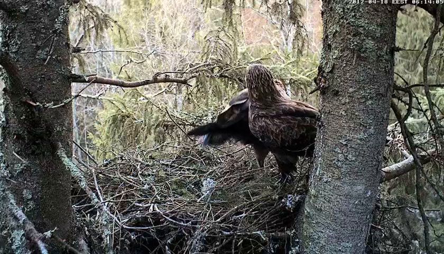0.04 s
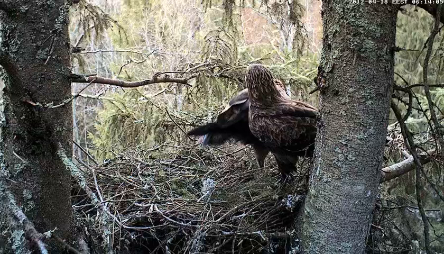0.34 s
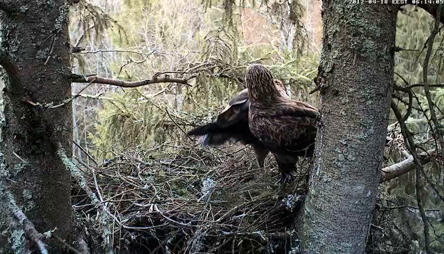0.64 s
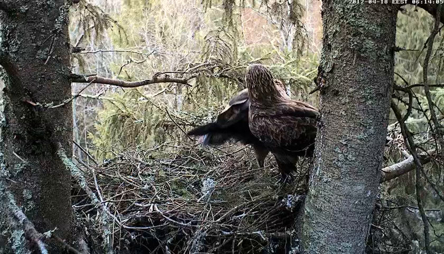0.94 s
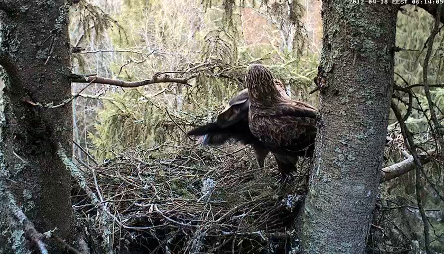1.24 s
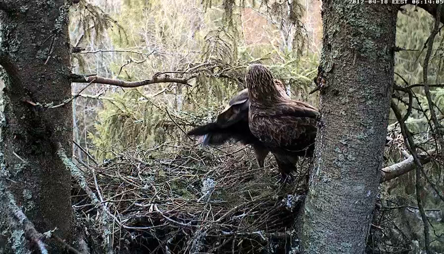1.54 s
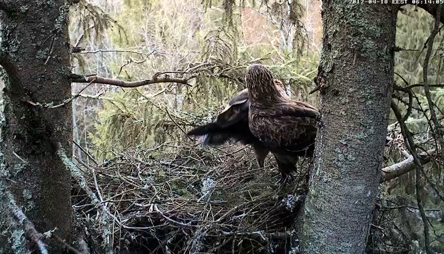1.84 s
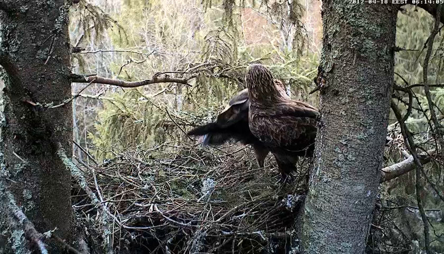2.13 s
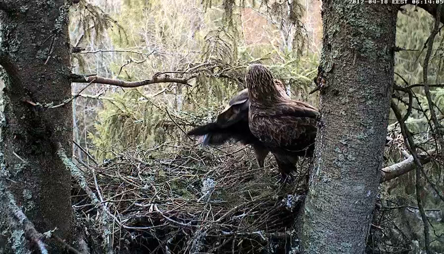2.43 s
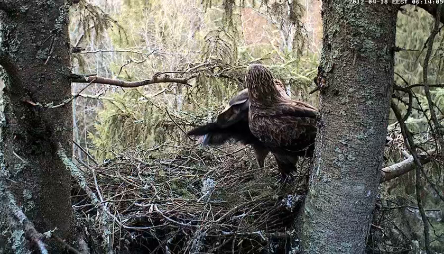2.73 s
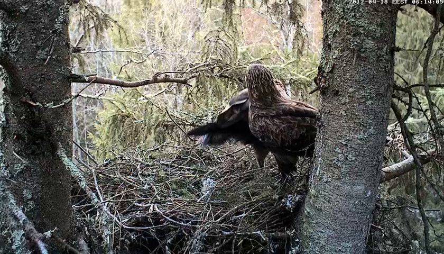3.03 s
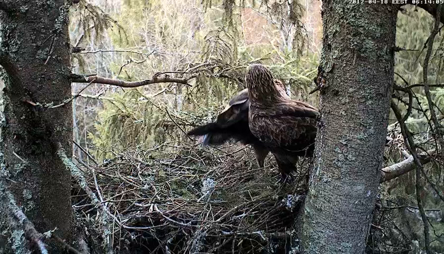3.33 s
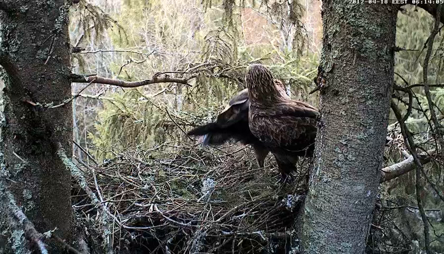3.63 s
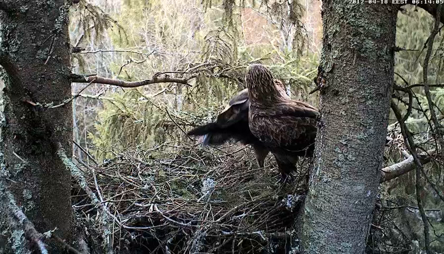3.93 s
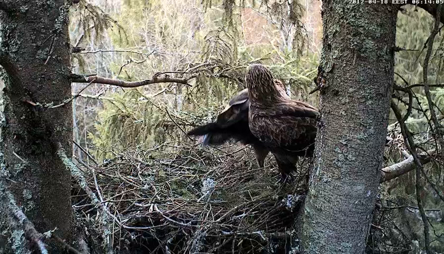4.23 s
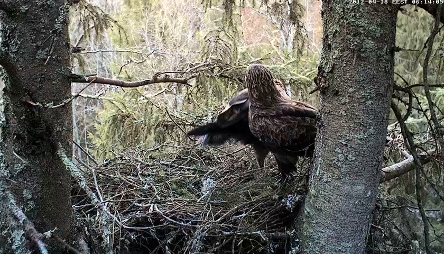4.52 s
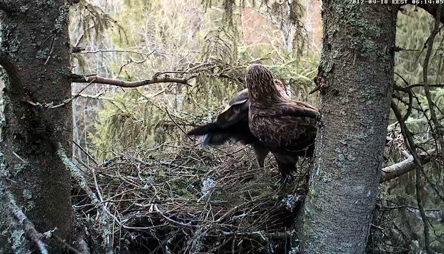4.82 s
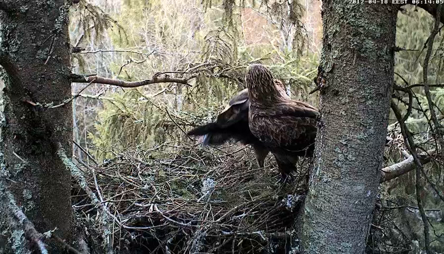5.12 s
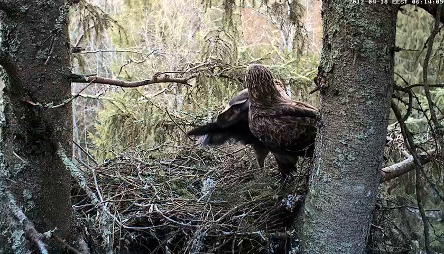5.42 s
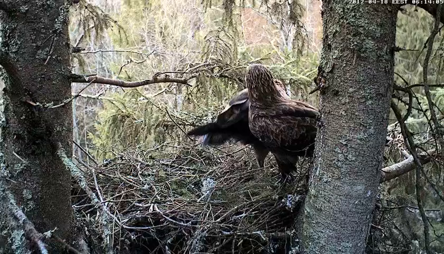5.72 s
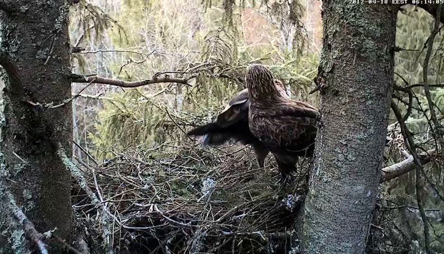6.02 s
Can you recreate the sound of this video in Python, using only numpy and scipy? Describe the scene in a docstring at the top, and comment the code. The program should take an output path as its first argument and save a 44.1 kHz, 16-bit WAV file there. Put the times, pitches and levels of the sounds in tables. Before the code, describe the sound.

An eagle calls three times close by in a forest, each short, hoarse squeal rising and then breaking into a clear falling whistle. The first two come near each other, the second loudest and slightly distorted; the third, raspier, follows a pause. The woods ring briefly after each. Small birds chirp faintly farther off over a soft hiss of trees. The sound is narrow, like a telephone.

```python
"""An eagle gives three loud, squealing calls close by: each rises hoarsely as the syrinx shakes, then
breaks into a clear falling whistle. The tail of another call dies away at the opening.
The forest rings after each call, small birds chirp in gliding tones farther off, the trees hiss softly.
It all passes through a telephone-rate converter that overloads on the loudest notes."""
import sys
import numpy as np
from scipy import signal
from scipy.fft import rfft, irfft, next_fast_len
from scipy.io import wavfile
from scipy.ndimage import uniform_filter1d

SR = 44100
rng = np.random.default_rng(int(sys.argv[2]) if len(sys.argv) > 2 else 0)


def master_out(mix):
    """Clip the mix to full scale and print it as 16-bit PCM to the path in sys.argv[1]."""
    frames = np.transpose(np.atleast_2d(mix))
    ceiling = np.clip(frames, -1, 1)
    pcm = np.round(ceiling * 32767).astype(np.int16)
    wavfile.write(sys.argv[1], SR, pcm)


N = 276507
T = np.arange(N) / SR

# The eagle's hoarse squeals, leading up to each whistle:
# t/s, length/s, start f/Hz, end f/Hz, end level/dB, swell/dB, hoarseness/0-1, treble strain/dB
SQUEALS = [ (.627, 0.038, 1290, 1623, -26.5, 13.5, 0.26, 2), (0.667, 0.025, 1891, 2020, -36.5, 1, 0.5, -9),
           (.696, 0.11, 1850, 1900, -42, 0.5, .9, -3.5), (.814, 0.031, 1900, 2048, -29.5, 5.5, 0.64, 1.5),
           (0.843, .011, 2100, 1696, -2.5, 31, .14, -5.5), (2.079, .09, 1292, 1948, -14, 31, .37, 0),
           (2.172, 0.14, 2320, 2258, -14.5, 10.5, 0.3, 3), (5.414, .135, 1588, 2090, -21, 22, .48, 3)]
# Its clear whistles, held and let go: t/s, hold/s, release/s, start f/Hz, held f/Hz, end f/Hz,
# start level/dB, held level/dB, fade/dB, extra hoarseness at the attack/0-1, treble strain/dB
WHISTLES = [ (0, 0.011, .07, 1717, 1725, 1687, 3, -10, 44, 0.07, -7.5),
            (0.854, .062, .087, 1620, 1588, 1319, -8.5, -9, 16.5, 0.05, -9.5),
            (2.303, .062, .12, 1923, 1864, 1333, -5, 1, 33, .14, -2),
            (5.55, .128, .072, 2114, 1943, 1530, -19, -11, 26.5, .38, 9)]
# Tremolo on the long notes: t/s, length/s, rate/Hz, depth/dB
THROBS = [(0.909, .094, 32, 2), (2.195, .28, 21.5, 0.5), (5.433, 0.37, 22.5, 3)]
# Second and third harmonic, ahead of the beak EQ: level/dB
OVERTONES_DB = [-25, -37.5]
# The open beak, ringing near 3.5 kHz: f/Hz, level/dB
BEAK_EQ = [(2700, 4), (3150, 4), (3400, 10), (3600, 1), (4000, -4), (4400, -10)]
# The throat's colour on the rasp: f/Hz, level/dB
THROAT_EQ = [(300, -28), (800, -12.5), (1200, -15.5), (1600, -1), (2000, 1.5), (2400, -5), (2850, -12.5),
             (3180, -11), (3450, -10.5), (4200, -44.5)]
# The band that strain lifts or dips: f/Hz, level/dB
STRAIN_EQ = [(2000, -61.5), (2500, -17.5), (3100, 1.5)]
# Envelope of the syrinx's other side, joining the last call on a lower note: t/s, level/dB
SECOND_VOICE_ENVELOPE = [(5.4, -59.5), (5.45, -37), (5.53, -47.5), (5.6, -37.5), (5.67, -58.5),
                         (5.735, -43.5), (5.775, -59)]
# What the trees send back of the eagle: f/Hz, level/dB
ECHO_EQ = [(500, -12), (1350, -2.5), (1620, -4), (1800, -9), (1930, -3.5), (2040, 10), (2150, -2.5),
           (2300, 0.5), (3100, 2.5), (3450, 4)]
# A small bird's dive-and-curl chirps: t/s, length/s, start f/Hz, level/dB, direct gain/dB
SWOOPS = [ (0.235, .11, 3000, -45.5, 1.5), (0.364, 0.098, 2400, -53, 6), (.55, 0.042, 3400, -38, -1.5),
          (1.157, 0.099, 3150, -36.5, -6.5), (1.283, 0.092, 3480, -44.5, 1),
          (1.485, 0.083, 3380, -40.5, 1.5)]
# Other small birds' straight glides: t/s, length/s, start f/Hz, end f/Hz, level/dB
SLIDES = [ (0.612, 0.079, 2507, 2870, -42), (1.24, .05, 2254, 2740, -47.5), (1.556, 0.084, 2440, 2796, -43),
          (1.95, .1, 2037, 2480, -46), (2.902, 0.098, 2198, 2657, -39.5), (3.103, 0.08, 2608, 2130, -39),
          (3.206, 0.051, 2366, 2606, -45.5), (3.503, 0.04, 3724, 3090, -53.5),
          (3.728, 0.055, 3260, 3040, -61.5), (3.746, .26, 2473, 2093, -53),
          (4.008, 0.052, 2800, 2333, -40.5), (4.009, 0.14, 3400, 3716, -49.5),
          (4.171, 0.086, 2518, 2160, -43), (4.289, .091, 2470, 2120, -43), (4.493, .07, 3350, 3740, -61),
          (4.755, 0.078, 3370, 3767, -47), (4.824, 0.011, 3520, 3970, -44.5),
          (4.85, 0.012, 3850, 3390, -49.5), (4.979, 0.019, 2585, 3150, -40),
          (4.994, 0.038, 3112, 2400, -43.5)]
# Spectrum of the hiss in the trees: f/Hz, level/dB
TREE_HISS_EQ = [(15, -45.5), (25, -15), (101, -19), (130, -12.5), (192, -5), (270, -5.5), (406, -4.5),
                (514, -4), (917, -8), (1470, -13.5), (2210, -1.5), (2570, -5), (2790, -11.5), (3110, -6),
                (4200, -10), (5460, -61.5), (9240, -120)]
# Colour of the overload's fizz: f/Hz, level/dB
FIZZ_EQ = [(5000, 0), (6200, 3.5), (8500, 2), (10000, -2), (15000, -4)]


def eagle_calls(pitch, strength, hoarse, strain_db, jitter=.024, shake=.82, shake_hz=230, rasp_hz=650):
    """A whistling syrinx; when hoarse, its pitch and strength shake and rasp spreads round the tone."""
    phase = sweep_phase(pitch * (1 + jitter * hoarse * flutter(shake_hz)))
    tone = np.sin(phase) * (1 + shake * hoarse * flutter(shake_hz))
    # overtones come and go; in the hoarse parts they smear and sink into the rasp
    smear = (0.18 + 1.5 * hoarse) * flutter(140)
    overtones = sum(from_db(db) * np.sin(k * phase + smear) for k, db in enumerate(OVERTONES_DB, 2))
    flicker = 1 + 0.6 * np.tanh(flutter(52))
    tone += coloured(overtones, BEAK_EQ) * flicker * (1 - hoarse) ** 2
    # chaotic vibration makes wide sidebands, which the throat colours
    sidebands = flutter(rasp_hz, order=1) * np.sin(phase) + flutter(rasp_hz, order=1) * np.cos(phase)
    rasp = rms_one(coloured(sidebands, THROAT_EQ))
    voice = np.sqrt(2 * (1 - hoarse ** 2)) * tone + from_db(-4) * hoarse * rasp
    treble = coloured(voice, STRAIN_EQ)
    return strength * (voice + (from_db(strain_db) - 1) * treble)


def syrinx(glide_s=.0082, slew_s=.008, breath_db=1.38, breath_hz=33, wander=.03, wander_hz=39.9):
    """Play the notes legato as one voice: curves of pitch, strength, hoarseness and strain."""
    notes = [(s, strain_db, *squeal(*row)) for s, *row, strain_db in SQUEALS]
    notes += [(s, strain_db, *whistle(*row)) for s, *row, strain_db in WHISTLES]
    pitch, strength, hoarse, strain = np.zeros((4, N))
    for s, strain_db, hz, db, hoarseness in sorted(notes, key=lambda note: note[0]):
        start = int(s * SR)
        span = slice(start, start + len(hz))
        pitch[start:], hoarse[start:], strain[start:] = hz[-1], hoarseness[-1], strain_db
        pitch[span], strength[span], hoarse[span] = hz, from_db(db), hoarseness
    swing, throb_db = throbbing()
    hoarse *= 1 - 0.22 * swing   # crests clear the voice, troughs roughen it
    unsteady_breath = from_db(breath_db * flutter(breath_hz))
    strength = slewed(strength * from_db(throb_db), slew_s) * unsteady_breath
    pitch = slewed(pitch, glide_s) * (1 + wander * hoarse * flutter(wander_hz))
    return pitch, strength, np.clip(slewed(hoarse, slew_s), 0, 1), slewed(strain, slew_s)


def squeal(length, start_hz, end_hz, end_db, swell_db, hoarse, swell_s=.023, ease=1.3):
    """Pitch, level and hoarseness of a note that swells fast while its glide flattens out."""
    t = np.arange(int(length * SR)) / SR
    pitch = end_hz + (start_hz - end_hz) * (1 - t / length) ** ease
    still_to_swell = np.exp(-t / swell_s) - np.exp(-length / swell_s)
    return pitch, end_db - swell_db * still_to_swell, np.full(len(t), hoarse)


def whistle(hold, release, start_hz, held_hz, end_hz, start_db, held_db, fade_db, hoarse):
    """The held note clears to a trace of hoarseness; on release, pitch and level fall together."""
    t = np.arange(int((hold + release) * SR)) / SR
    held, let_go = np.minimum(t / hold, 1), np.maximum(t - hold, 0) / release
    pitch = start_hz + (held_hz - start_hz) * held + (end_hz - held_hz) * let_go
    level_db = start_db + (held_db - start_db) * held - fade_db * let_go ** 0.93
    return pitch, level_db, 0.036 + hoarse * (1 - held)


def throbbing():
    """The voice's tremolo: its swing (-1 in a trough, 1 on a crest) and its gain in dB."""
    swing, gain_db = np.zeros((2, N))
    for s, length, rate_hz, depth_db in THROBS:
        wave = -np.cos(2 * np.pi * rate_hz * (T - s)) * ((T >= s) & (T < s + length))
        swing += wave
        gain_db += depth_db * wave
    return swing, gain_db


def second_voice(pitch, low_hz=976, at_main_hz=1666, tracking=.35, jitter=.0392, shake=.73, sum_db=5):
    """The syrinx's low note couples with the last call, so the sum of their pitches sounds too."""
    s, level_db = np.transpose(SECOND_VOICE_ENVELOPE)
    low_pitch = (low_hz + tracking * (pitch - at_main_hz)) * (1 + jitter * flutter(211))
    tones = np.sin(sweep_phase(low_pitch)) + from_db(sum_db) * np.sin(sweep_phase(low_pitch + pitch))
    envelope = from_db(np.interp(T, s, level_db)) * ((T >= s[0]) & (T <= s[-1]))
    return np.sqrt(2) * envelope * (1 + shake * flutter(230)) * tones


def forest_reverb(x, near_t60=1.0, far_t60=2.4, far_db=-12, build_s=0.0085):
    """Countless faint echoes: near trunks answer fast and die soon, the deep wood rings on."""
    t = T[:2 * SR]
    decay = from_db(-60 * t / near_t60) + from_db(far_db - 60 * t / far_t60)
    echoes = rng.standard_normal(len(t)) * decay * (1 - np.exp(-t / build_s))
    return signal.fftconvolve(x, echoes / np.linalg.norm(echoes))[:N]


def swoops(dive_s=.043, low_hz=2100, curl_hz_per_s=6500):
    """A small bird's notes, each diving to the same low pitch and curling up again."""
    for s, length, start_hz, db, direct_db in SWOOPS:
        t = np.arange(int(length * SR)) / SR
        dive = np.cos(np.pi / 2 * np.minimum(t / dive_s, 1)) ** 2
        curl = curl_hz_per_s * np.maximum(t - dive_s, 0)
        yield s, low_hz + (start_hz - low_hz) * dive + curl, db, direct_db


def slides(unity_hz=2880, db_per_octave=17.5):
    """Plain gliding notes; the higher singers sit nearer, so they come through drier."""
    for s, length, start_hz, end_hz, db in SLIDES:
        pitch = np.linspace(start_hz, end_hz, int(length * SR))
        yield s, pitch, db, db_per_octave * np.log2(pitch.mean() / unity_hz)


def small_birds(fade_db=-4, ramp_share=0.12, waver=.022):
    """Swoops and slides as wavering sines; returns the reverb send and the direct sound."""
    send, direct = np.zeros((2, N))
    wavering = 1 + waver * flutter(100)
    for s, pitch, db, direct_db in [*swoops(), *slides()]:
        along = np.linspace(0, 1, len(pitch))
        span = slice(int(s * SR), int(s * SR) + len(pitch))
        ramps = np.clip(np.minimum(along, 1 - along) / ramp_share, 0, 1)
        envelope = ramps * from_db(db + fade_db * along)
        note = np.sqrt(2) * envelope * np.sin(sweep_phase(pitch * wavering[span]))
        send[span] += note
        direct[span] += from_db(direct_db) * note
    return send, direct


def far_warble(notes_per_s=7, note_s=.07, centre_hz=2450, spread_hz=230, level_db=-54.5):
    """Birds deep in the wood: faint glides, loosely timed and randomly pitched."""
    out, swell = np.zeros(N + SR), np.hanning(int(note_s * SR))
    for k, (late, start, end) in enumerate(rng.uniform(-1, 1, (int(notes_per_s * N / SR), 3))):
        pitch = centre_hz + spread_hz * np.linspace(start, end, len(swell))
        at = int((k + (1 + late) / 2) / notes_per_s * SR)
        out[at:at + len(swell)] += swell * np.sin(sweep_phase(pitch))
    return from_db(level_db) * out[:N]


def tree_hiss(level_db=-51.5):
    """A soft, steady bed of air in the trees."""
    return from_db(level_db) * rms_one(coloured(rng.standard_normal(N), TREE_HISS_EQ))


def from_db(db):
    """Decibels to gain."""
    return 10 ** (np.asarray(db) / 20)


def rms_one(x):
    """Scale to unit power."""
    return x / np.sqrt(np.mean(x ** 2) + 1e-20)


def sweep_phase(hz):
    """Oscillator phase along a pitch curve."""
    return 2 * np.pi * np.cumsum(hz) / SR


def coloured(x, curve):
    """EQ a sound through points of f/Hz, level/dB."""
    hz, db = np.transpose(curve)
    size = next_fast_len(N)
    bins = np.maximum(np.arange(size // 2 + 1) * SR / size, 1)
    gain = from_db(np.interp(np.log(bins), np.log(hz), db))
    return irfft(rfft(x, size) * gain, size)[:N]


def flutter(hz, order=2):
    """Random modulator: low-passed noise at unit power."""
    lowpass = signal.butter(order, hz, fs=SR, output="sos")
    return rms_one(signal.sosfilt(lowpass, rng.standard_normal(N)))


def slewed(x, seconds):
    """Smooth a control so that its steps take this long."""
    return uniform_filter1d(x, max(int(seconds * SR), 1), mode="nearest")


def scene(eagle_echo_db=-19, bird_echo_db=-2):
    """The mix: eagle close and almost dry, small birds half lost in the wood, far warble fully wet."""
    pitch, strength, hoarse, strain_db = syrinx()
    eagle = eagle_calls(pitch, strength, hoarse, strain_db) + second_voice(pitch)
    bird_send, bird_direct = small_birds()
    hiss = tree_hiss()
    eagle_echo = from_db(eagle_echo_db) * forest_reverb(coloured(eagle, ECHO_EQ))
    bird_echo = from_db(bird_echo_db) * forest_reverb(bird_send + far_warble(), near_t60=.9, far_db=-4)
    return (eagle + eagle_echo + bird_direct + bird_echo + hiss)[None]


def record(dry, rate_hz=8000, ceiling=0.66, bias=.006, smoothing_hz=3950, knee=36):
    """Lo-fi converter: overload at its low sample rate folds overtones back down."""
    down, up = rate_hz // 100, SR // 100
    fade_in = np.clip((T - 0.048) / 0.0015, 0, 1)
    narrowband = signal.resample_poly(dry[0] * fade_in, down, up)
    clipped = np.clip(narrowband, -ceiling - bias, ceiling - bias)
    # loose smoothing mirrors the treble and overshoots into a second, rounder clipper
    smoothing = signal.firwin(16 * up + 1, smoothing_hz, fs=rate_hz * up, window=("kaiser", 9))
    smoothed = signal.resample_poly(clipped, up, down, window=smoothing)[:N]
    rounded = smoothed / (1 + np.abs(smoothed / ceiling) ** knee) ** (1 / knee)
    high_cut = signal.cheby2(20, 50, 15900, fs=SR, output="sos")
    return signal.sosfilt(high_cut, coloured(rounded, FIZZ_EQ))[None]


dry = scene()
out = record(dry)
master_out(out)
```